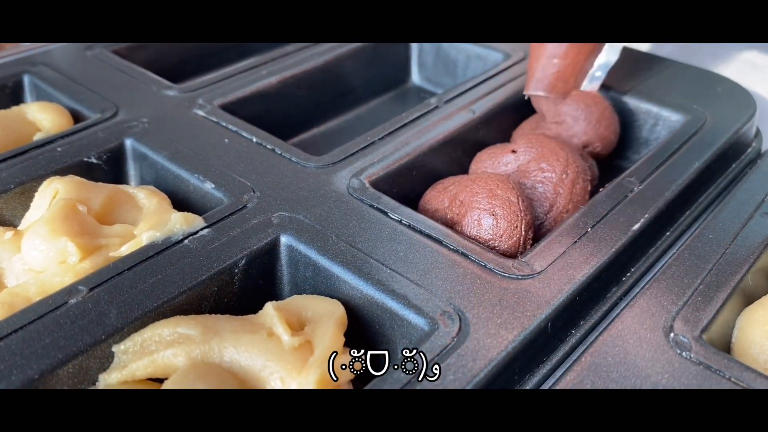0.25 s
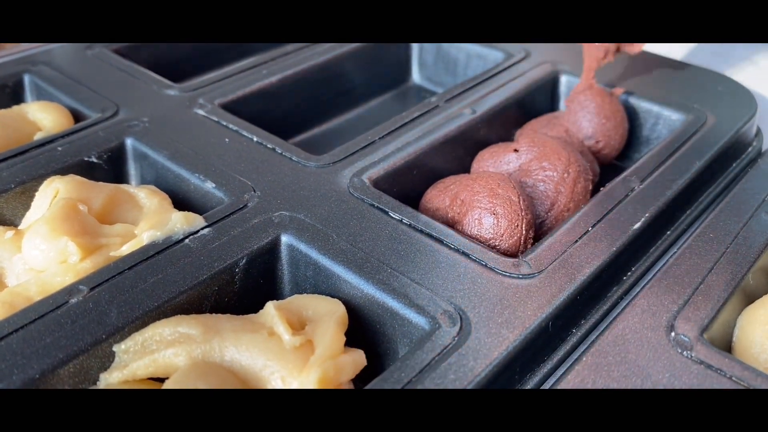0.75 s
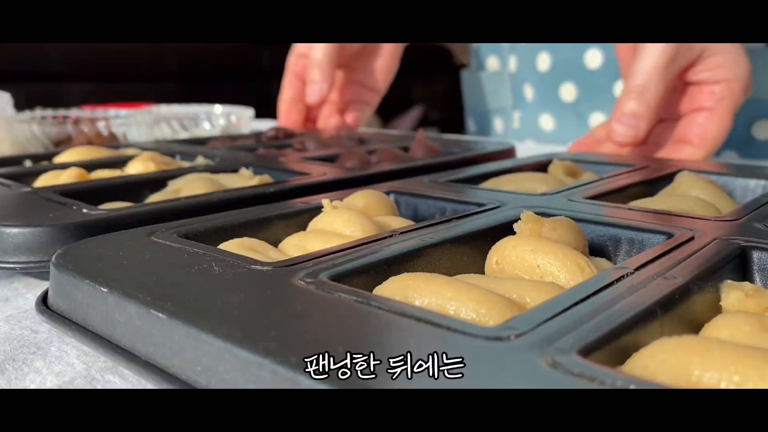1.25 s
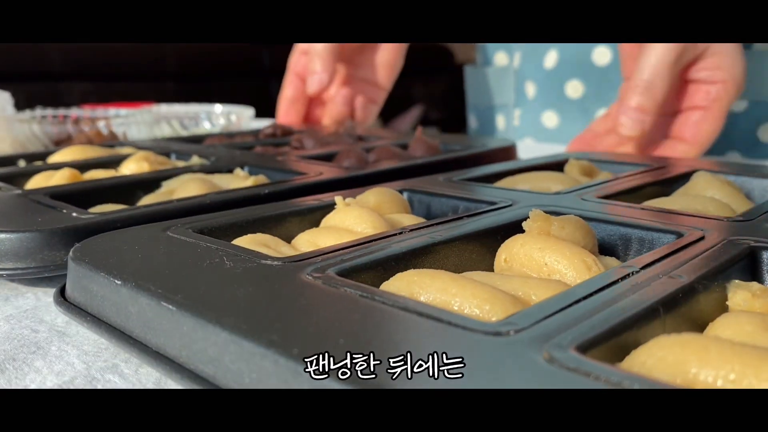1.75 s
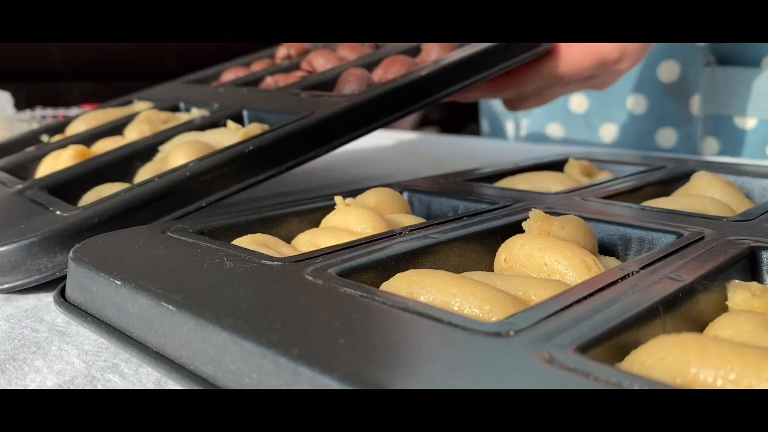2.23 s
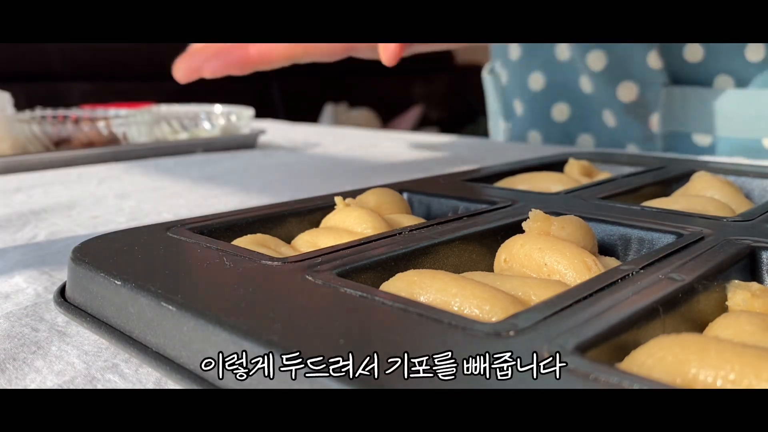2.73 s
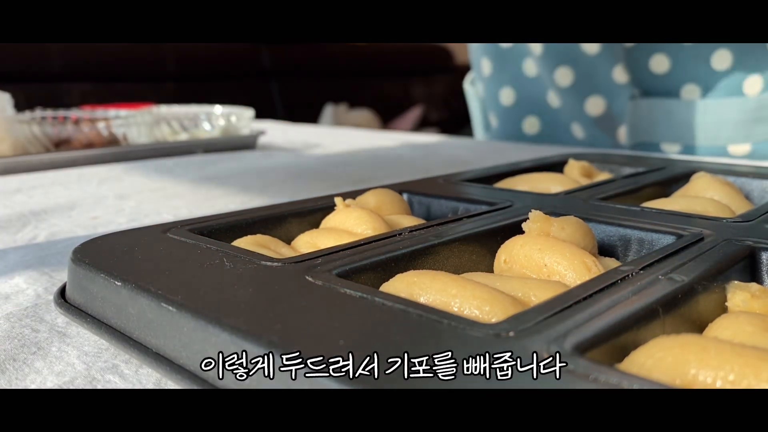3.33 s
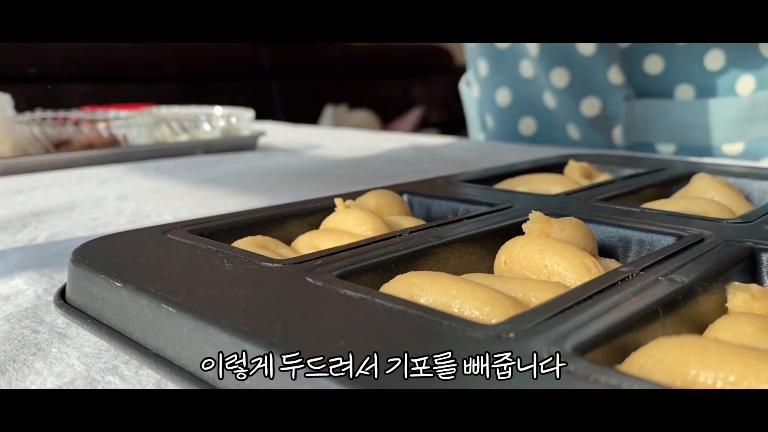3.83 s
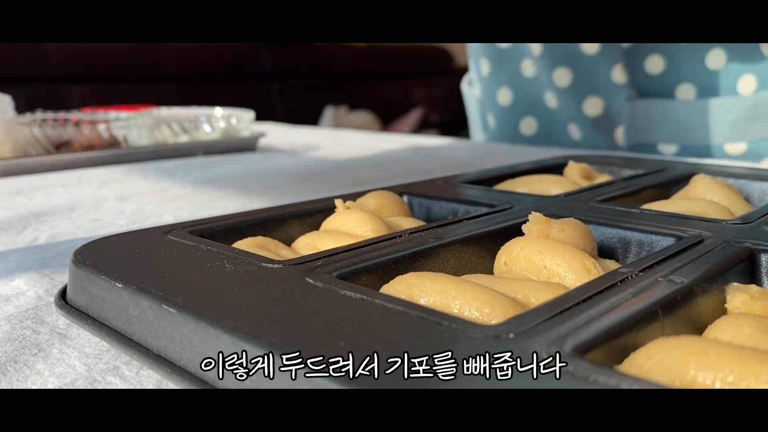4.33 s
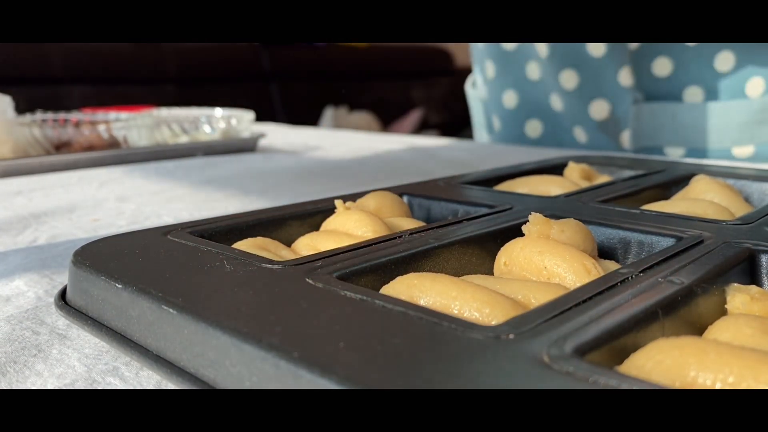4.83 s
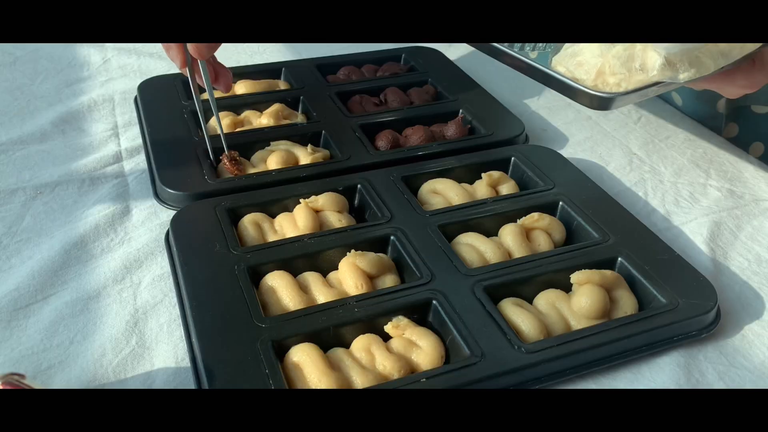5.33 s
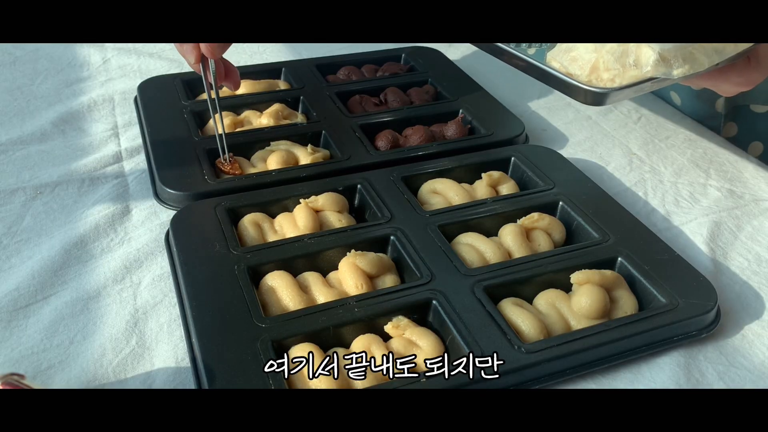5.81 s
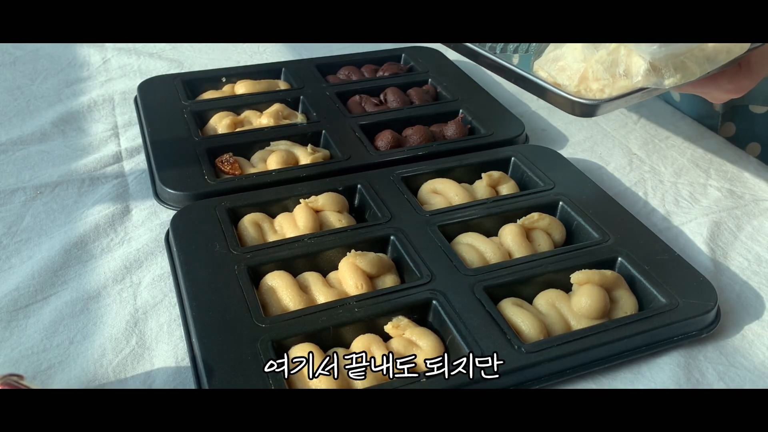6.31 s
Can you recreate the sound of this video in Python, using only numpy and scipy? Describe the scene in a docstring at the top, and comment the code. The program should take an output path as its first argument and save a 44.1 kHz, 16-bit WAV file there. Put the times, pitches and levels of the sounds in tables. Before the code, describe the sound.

A piping bag crinkles faintly, then a batter-filled steel baking pan scrapes, thumps softly and is rapped five times on a kitchen table.

```python
"""A home kitchen, pan and bag close to a two-port microphone, in three shots.
First a piping bag crinkles: clicks in noise, with air whistling and popping at the tip.
Then a steel baking pan full of batter scrapes and bumps softly as it is picked up, and is rapped five times
on a table: damped modes and noise. The batter damps it, so the room and a second pan carry the tail.
A faint appliance whine stops as the last shot begins, where tweezers tick; its hum stays, fainter."""
import sys
import numpy as np
from scipy import signal
from scipy.fft import rfft, irfft, next_fast_len
from scipy.io import wavfile

SR = 44100
rng = np.random.default_rng(int(sys.argv[2]) if len(sys.argv) > 2 else 0)


def master_out(mix):
    """Clip the mix to full scale and print it as 16-bit PCM to the path in sys.argv[1]."""
    frames = np.transpose(np.atleast_2d(mix))
    ceiling = np.clip(frames, -1, 1)
    pcm = np.round(ceiling * 32767).astype(np.int16)
    wavfile.write(sys.argv[1], SR, pcm)


N = 289645
TIME = np.arange(N) / SR
RING = TIME[:SR // 2]  # time axis of one blow

# start of each shot, and the end of the last: t/s
CUTS_S = [0, 1.078, 5.322, 7]


def undb(db):
    """Decibels to gain."""
    return 10 ** (np.asarray(db) / 20)


def at_hz(table, hz, axis=1):
    """Read a column of a table on a log-frequency axis."""
    rows = np.array(table, float)
    return np.interp(np.log(np.maximum(hz, 1)), np.log(rows[:, 0]), rows[:, axis])


def tilted(spectrum, db_per_octave):
    """Make a (f/Hz, level/dB) spectrum brighter or duller, pivoting at 1 kHz."""
    return [(hz, db + db_per_octave * np.log2(hz / 1000)) for hz, db in spectrum]


def level(x, db):
    """Set the rms level."""
    return x * undb(db) / np.sqrt(np.mean(x ** 2))


def hit_level(x, db):
    """Set the level that a blow's energy has when spread over 30 ms."""
    energy = np.mean(x ** 2) * x.shape[-1]
    return x * undb(db) / np.sqrt(energy / (.03 * SR))


def colour(x, spectrum):
    """Filter a sound by a (f/Hz, level/dB) spectrum."""
    size = next_fast_len(x.shape[-1] + SR // 10)
    gain = undb(at_hz(spectrum, np.fft.rfftfreq(size, 1 / SR)))
    return irfft(rfft(x, size) * gain, size)[..., :x.shape[-1]]


def add(out, s, x):
    """Mix a sound in at time s."""
    i = max(int(s * SR), 0)
    out[:, i:i + x.shape[-1]] += x[..., :N - i]


def fade(t60, t=RING):
    """Exponential decay that starts at t = 0."""
    return (t >= 0) * np.exp(-np.log(1000) * np.maximum(t, 0) / t60)


def wander(hz, size=N):
    """Slow complex chance of unit power, about hz wide."""
    full = next_fast_len(size)
    noise = rng.standard_normal(full) + 1j * rng.standard_normal(full)
    spectrum = noise / (1 + (2 * np.fft.fftfreq(full, 1 / SR) / hz) ** 2)
    z = np.fft.ifft(spectrum)[:size]
    return z / np.std(z)


def strokes(rows, attack_s, release_s):
    """Gain of hand movements: each swells by 60 dB, holds and fades by 60 dB."""
    gain = 0
    for s, held, db in rows:
        before = np.maximum(s - TIME, 0) / attack_s
        after = np.maximum(TIME - s - held, 0) / release_s
        gain = gain + undb(db - 60 * (before + after))
    return gain


# likeness of the left and right ports in diffuse sound: f/Hz, likeness [0-1]
LIKENESS = [(60, 1), (200, 0.95), (400, 0.7), (700, 0.6), (1300, 0), (8000, 0.4)]


def diffuse(size):
    """Stereo noise, alike in the bass and less related in the treble."""
    full = next_fast_len(size)
    like = np.clip(at_hz(LIKENESS, np.fft.rfftfreq(full, 1 / SR)), -1, 1)
    mid, side = rfft(rng.standard_normal((2, full))) * np.sqrt([1 + like, 1 - like])
    return irfft(np.array([mid + side, mid - side]), full)[:, :size] / np.sqrt(2)


def flicker(x, depth_db=3.0, rate_hz=22, count=10):
    """The midrange of a noise flickers, each narrow band on its own."""
    centres = np.geomspace(500, 3000, count + 2)
    size = next_fast_len(N)
    spectrum, hz = rfft(x, size), np.fft.rfftfreq(size, 1 / SR)
    for k in range(count):
        band = irfft(spectrum * np.interp(hz, centres[k:k + 3], [0, 1, 0]), size)[:, :N]
        gain = undb(depth_db * np.sqrt(2) * wander(rate_hz).real)
        x = x + band * (gain - 1)
    return x


def appliance(tones, speed=1):
    """Narrow wavering tones; speed raises them all alike."""
    out = 0
    for hz, db, width, waver, pan_db, lead in tones:
        share = np.clip(waver, 0, 1)
        carrier = np.exp(2j * np.pi * hz * speed * TIME)
        tone = (np.sqrt(1 - share ** 2) + share * wander(width * speed)) * carrier
        ports = np.real([tone * undb(pan_db), tone * np.exp(1j * lead * speed)])
        out = out + level(ports, db)
    return out


# room air of each shot, shape only: f/Hz, level/dB per Hz
AIR_PIPING = [(18, -85), (30, -36), (109, -4.5), (364, -9.5), (520, -3.5), (702, -11), (780, -17.5),
              (1040, -17.5), (1320, -11.5), (1670, -23.5), (4080, -34), (6550, -44.5), (12600, -50),
              (16000, -74)]
AIR_RAPPING = [(25, -16), (65, -6.5), (110, -9.5), (140, -7.5), (200, -13.5), (330, -6.5), (420, -11),
               (530, -18), (700, -9.5), (936, -23), (1370, -23.5), (2840, -41), (4400, -45.5),
               (16000, -68.5)]
AIR_LAST = [(15, -32), (25, -20), (59, -5), (97, -13.5), (285, -14), (354, -20.5), (384, -12), (476, -31),
            (575, -23.5), (734, -29.5), (1020, -29), (2200, -35.5), (3500, -42), (6380, -47), (8360, -55.5),
            (11600, -43.5), (16000, -69)]
AIR_PIPING_DB, AIR_RAPPING_DB, AIR_LAST_DB = -58.5, -57, -67
# appliance tones as heard in the rapping shot:
# f/Hz, level/dB, width/Hz, waver [share], left minus right/dB, right leads/rad
WHINE = [(673.3, -57, 9.1, 0.19, -6.5, 1.0), (1353, -77.5, 13, 0.78, -10, 0.98)]
HUM = [(385.8, -70.5, 5, .85, 0.00088, 0.092)]
PIPING_SPEED = 2  # the first shot runs at double speed, so its tones lie an octave up
PIPING_WHINE_DB, PIPING_HUM_DB, LAST_HUM_DB = -4, 1.5, -10.5  # against the rapping shot


def background(swell_db=.3):
    """Each shot has its own room air; the appliance hums throughout and whines until the last cut."""
    airs = [(AIR_PIPING, AIR_PIPING_DB), (AIR_RAPPING, AIR_RAPPING_DB), (AIR_LAST, AIR_LAST_DB)]
    piping, rapping, last = [level(colour(diffuse(N), air), db) * undb(swell_db * wander(6).real)
                             for air, db in airs]
    piping = piping + undb(PIPING_WHINE_DB) * appliance(WHINE[:1], PIPING_SPEED)
    piping = piping + undb(PIPING_HUM_DB) * appliance(HUM, PIPING_SPEED)
    rapping = rapping + appliance(WHINE + HUM)
    last = flicker(last) + undb(LAST_HUM_DB) * appliance(HUM)
    shots = zip([piping, rapping, last], CUTS_S, CUTS_S[1:])
    return sum(x * (TIME >= start) * (TIME < end) for x, start, end in shots)


# kitchen reverberation: f/Hz, level/dB, t60/s, likeness of left and right [0-1]
ROOM = [(60.47, -17, 0.99, 0.99), (137, -1.5, 0.36, 1), (228, -10.5, 0.31, 0.93), (380, -4, 0.48, 0.93),
        (730, -5.5, 0.42, 0.41), (1450, -3, 0.62, .15), (2400, -6.5, 0.48, 0.13), (5300, -9, 0.45, 0.1),
        (10400, -12, 0.28, 0.076), (16030, -11.5, 0.32, .1)]


def kitchen(x, first_s=0.00083, build_s=0.0037):
    """Reflections build up after the nearest wall answers, then die away band by band."""
    t, hz = TIME[:SR], np.fft.rfftfreq(SR, 1 / SR)
    like = np.clip(at_hz(ROOM, hz, axis=3), 0, 1)
    mid, side = rfft(rng.standard_normal((2, SR))) * np.sqrt([1 + like, 1 - like]) / np.sqrt(2)
    walls, response = np.array([mid + side, mid - side]), 0
    log_centres = np.log([row[0] for row in ROOM])
    for (_, db, t60, _), own in zip(ROOM, np.eye(len(ROOM))):
        band = np.interp(np.log(hz + 1), log_centres, own)
        envelope = np.clip((t - first_s) / build_s, 0, 1) * fade(t60, t)
        response = response + undb(db) * irfft(walls * band, SR) * envelope / np.linalg.norm(envelope)
    return signal.fftconvolve(x.mean(axis=0, keepdims=True), response, axes=1)[:, :N]


# tweezers tick as they place a topping: t/s, level/dB
TICKS = [(5.375, -88), (5.722, -90), (5.89, -80)]
# colour of the tick: f/Hz, level/dB
TICK_COLOUR = [(1500, -8), (4000, -5), (7000, -8), (11000, -1), (15500, 2)]


def tweezers(t60=.012):
    """Thin steel tips meet with a tiny bright tick."""
    out = np.zeros((2, N))
    for s, db in TICKS:
        add(out, s, hit_level(colour(diffuse(len(RING)) * fade(t60, RING - .001), TICK_COLOUR), db))
    return out


# the loudest air pockets at the bag's tip: t/s, level/dB, tilt/dB per octave, t60/s
POPS = [(.056, -71, -1, .014), (0.06, -73, 6, .008), (0.066, -71, -5, .015), (0.1075, -69, -2, .012),
        (.117, -66, 2, .017), (0.1313, -52, -1.5, 0.016), (0.139, -58.5, 5, 0.015),
        (0.1935, -71.5, 6.5, .014), (.2585, -73, -2, .017), (.287, -71, -5, .012), (.296, -72, -1, .01),
        (0.9283, -66.5, 2.5, .005), (0.9493, -76, 1, .012), (.963, -65.5, -5, .02), (.976, -67, 14, .012),
        (0.99, -67, -7, .012), (1.002, -65, 3, 0.026)]
# colour of a pop before its tilt: f/Hz, level/dB
POP_COLOUR = [(700, 0), (1600, 12), (2200, 12), (2800, 10), (3800, 2.5), (6000, -1), (10000, 3),
              (15000, -13)]


def tip_pops():
    """Air pockets burst at the piping bag's tip: short decaying noises."""
    out = np.zeros((2, N))
    for s, db, tilt, t60 in POPS:
        burst = diffuse(len(RING)) * fade(t60, RING - .001)
        add(out, s, hit_level(colour(burst, tilted(POP_COLOUR, tilt)), db))
    return out


# squeezes of the bag: t/s, held/s, level/dB, swell by 60 dB/s, tilt/dB per octave, whistle level/dB
SQUEEZES = [(.09, 0.033, -71.5, 0.3, -1.5, -6), (.135, 0.057, -68, 0.3, 1.5, -18),
            (.29, 0.011, -69.5, 0.16, 0, -18), (.88, 0.025, -75.5, 0.45, 1, -16),
            (.963, 0.012, -65.5, 0.1, 9, -10), (.99, 0.014, -67, 0.16, -1, -5)]
# colour of the plastic before its tilt: f/Hz, level/dB
BAG_COLOUR = [(700, 5.5), (1800, 10.5), (3000, -2), (3650, 2.5), (5100, 0), (5800, -5), (6800, 0),
              (8400, -3), (10000, -1.5), (15000, -7.5)]
SQUEEZE_RELEASE_S = 0.12  # to fade by 60 dB
TIP_HZ, TIP_WIDTH_HZ = 5770, 900  # resonance of air forced through the tip


def piping_bag(crinkle_db=3, grain_rate=1200, grain_db=1.3, hiss=0.44, sticky_db=2.5):
    """Plastic crinkles in uneven spurts of tiny clicks at each squeeze; air whistles and pops at the tip."""
    sizes = undb(grain_db * np.minimum(rng.exponential(size=N), 4))
    grains = (rng.random(N) < grain_rate / SR) * sizes
    clicks = signal.lfilter([1], [1, -.9], grains)
    crinkle = diffuse(N) * (clicks + hiss) * undb(sticky_db * wander(60).real)
    whistle = (wander(TIP_WIDTH_HZ) * np.exp(2j * np.pi * TIP_HZ * TIME)).real
    out = 0
    for s, held, db, attack_s, tilt, tip_db in SQUEEZES:
        plastic = level(colour(crinkle, tilted(BAG_COLOUR, tilt)), crinkle_db)
        squeeze = strokes([(s, held, db)], attack_s, SQUEEZE_RELEASE_S)
        out = out + (plastic + level(whistle, tip_db)) * squeeze
    return out * (TIME < CUTS_S[1]) + tip_pops()


def rub(speed, spectrum, uneven_db=3.5):
    """Friction: a hiss that follows the movement, catching and letting go."""
    return level(colour(diffuse(N), spectrum), 0) * speed * undb(uneven_db * wander(40).real)


# light brushing as the hands shift their grip: t/s, held/s, level/dB
BRUSHES = [(1.63, .08, -85), (2.2, 0.022, -85), (2.395, .025, -80), (2.56, .01, -85), (2.63, 0.14, -77.5)]
# colour of fingers on steel and cloth: f/Hz, level/dB
BRUSH_COLOUR = [(2000, -7), (4000, 5), (6500, 2.5), (11000, -3.5), (16000, -14)]


def grip(attack_s=0.2, release_s=.16):
    """Fingers brush over steel and cloth: a faint uneven hiss."""
    return rub(strokes(BRUSHES, attack_s, release_s), BRUSH_COLOUR)


# the pan scraping over the cloth: t/s, held/s, level/dB
SLIDES = [(1.62, .38, -74), (2.22, .08, -81), (2.67, .08, -79.5)]
# colour of the scraping hiss: f/Hz, level/dB
SLIDE_COLOUR = [(1200, -23.5), (2400, -8), (3000, -2.5), (3700, -3.5), (4500, -1.5), (5200, -12),
                (6200, -12), (8000, -31), (16000, -38.5)]
# resonances that scraping excites: f/Hz, width/Hz, level/dB, shift as the pan tips up/Hz
SLIDE_RINGS = [(2750, 110, -4.5, -400), (3100, 80, -1, -420), (3500, 150, -2.5, -350),
               (3950, 180, -1.5, -450), (4300, 180, -2, -300), (4650, 260, -4, -150),
               (5600, 600, -10.5, -600)]
SLIDE_ATTACK_S, SLIDE_RELEASE_S = 0.41, 0.44  # to swell and to fade by 60 dB
LIFT_START_S, LIFT_LENGTH_S = 1.72, .36  # the pan tips up off the cloth


def scrape(hiss_db=-3, sing_db=-2.5, drift=.012, catch_db=2.0):
    """The pan drags over the cloth: a hiss, and steel resonances that catch, let go and glide as it tips up."""
    speed = strokes(SLIDES, SLIDE_ATTACK_S, SLIDE_RELEASE_S)
    lift = np.clip((TIME - LIFT_START_S) / LIFT_LENGTH_S, 0, 1)
    drifting = 1 + drift * wander(2.2).real
    sing = 0
    for hz, width, db, shift_hz in SLIDE_RINGS:
        cycles = np.cumsum((hz + shift_hz * lift) * drifting) / SR
        port_phase = np.exp(2j * np.pi * rng.random((2, 1)))
        sing = sing + undb(db) * wander(width) * np.exp(2j * np.pi * cycles) * port_phase
    steel = level(sing.real, sing_db) * speed * undb(catch_db * wander(18).real)
    return undb(hiss_db) * rub(speed, SLIDE_COLOUR) + steel


def mode(hz, t60, swell, lag=0., t=RING):
    """A damped vibration that builds up over the swell time; it reaches the right side lag radians later."""
    rise = 1 - np.exp(-np.maximum(t, 0) / swell)
    return rise * fade(t60, t) * np.sin(2 * np.pi * hz * t - np.array([[0], [lag]]))


# modes of the table, levels against each other: f/Hz, level/dB, t60/s, swell/s
TABLE_MODES = [(57.4, -1, 0.31, 0.015), (66, 2.5, 0.2, 0.0072)]


def table_boom(db):
    """The table top swings late and low under a blow."""
    return hit_level(sum(undb(g) * mode(hz, t60, swell) for hz, g, t60, swell in TABLE_MODES), db)


MODE_DETUNE = .012  # random spread of each mode's pitch from blow to blow [share]


def pan_ring(modes, lead, touch_db, force_db, flat, cushion, opposed=False,
             scatter_db=1.4, swell=0.0027, lag_per_khz=0.825):
    """Two contacts ring a pan, each mode by how it lands; opposed gives neighbours opposite signs."""
    out = 0
    for k, (hz, db, t60, flat_db, cushion_db) in enumerate(modes):
        size, spread, detune = rng.standard_normal(3)
        hz = hz * (1 + MODE_DETUNE * detune)
        lag = lag_per_khz * hz / 1000 * (1 + .5 * spread)
        touch = undb(touch_db) * mode(hz, t60, swell, lag)
        ring = touch + mode(hz, t60, swell, lag, RING - lead)
        sign = -1 if opposed and k % 2 else 1
        mode_db = force_db + db + flat * flat_db + cushion * cushion_db + scatter_db * size
        out = out + sign * undb(mode_db) * ring
    return out


def clash(spectrum, t60, lead, touch_db, db, chatter_db=4.0, lag_s=.000028, scattered=0.94):
    """Crowded modes: a noise jumps at both contacts, chatters as it dies and partly reaches the right later."""
    contacts = undb(touch_db) * fade(t60 / 2) + fade(t60, RING - lead)
    chatter = undb(chatter_db * wander(700, len(RING)).real)
    ports = np.exp(-2j * np.pi * np.outer([0, lag_s], np.fft.rfftfreq(len(RING), 1 / SR)))
    direct_noise = irfft(rfft(rng.standard_normal(len(RING))) * ports, len(RING))
    noise = direct_noise + scattered * diffuse(len(RING))
    return hit_level(colour(noise, spectrum) * contacts * chatter, db)


# the second pan rests on the table and rings along with bumps and raps:
# f/Hz, level/dB, t60/s, more when the rap lands flat/dB, more when cushioned/dB
RESTING_PAN_MODES = [(216.7, -44.5, 0.53, 8.5, 1), (349.6, -41.5, 0.42, -4.5, 6.5),
                     (389, -43.5, 0.2, -5, 7.5), (445, -47, 0.36, -2, 10.5), (662, -43, .42, 5, 3.5),
                     (1405, -49.5, .35, -3, -9.5), (2455, -63.5, 0.4, 1, 9.5)]
# soft bumps as the pan is handled: t/s, flex pitch f/Hz, level/dB, table level/dB, t60 before its share/s
BUMPS = [(1.164, 69.7, -56.5, -56.5, 0.054), (1.7, 110.4, -18.5, -27, 0.23), (1.819, 96.7, -46, -52, 0.078),
         (1.857, 136.3, -59.5, -59, 0.044), (1.991, 106.7, -33, -52.5, 0.12),
         (2.102, 239.6, -40.5, -60.5, 0.066), (2.112, 84.8, -29, -34.5, 0.16),
         (2.292, 77.6, -49.5, -47.5, 0.134), (6.32, 70.6, -73, -62.5, .17)]
# flexing modes of the held pan: multiple of the flex pitch, level/dB, share of the t60
FLEX_MODES = [(1, 2.5, 0.43), (1.25, -16.5, 0.88), (2.45, 3.5, 0.15), (4.25, 2, 0.11)]
# a harder bump is brighter: cut-off of the softest (multiple of the flex pitch), its rise per unit of
# energy, build-up of the first flex mode (s)
BUMP_SOFT, BUMP_RISE, BUMP_SWELL_S = 1.3, 232, 0.013
# the pan settles: share by which the flex starts sharp, time to sag (s), time until the cloth chokes it (s)
BUMP_SAG, BUMP_SAG_S, BUMP_CHOKE_S = 0.18, .018, 0.028
# off the cloth the pan rings freely: from when (s), pitch (Hz), decay (s), level against the bump (dB)
FREE_FROM_S, FREE_HZ, FREE_T60_S, FREE_DB = 1.95, 141.5, 0.58, -13.5


def bumps(sympathy_db=20, tick_db=-56, tick_t60=.05):
    """Soft blows flex the pan's lowest modes, which sag and choke; each ticks, and the lifted pan rings on."""
    out = np.zeros((2, N))
    sagging = RING + BUMP_SAG * BUMP_SAG_S * (1 - np.exp(-RING / BUMP_SAG_S))
    choke = 1 / (1 + (RING / BUMP_CHOKE_S) ** 6)
    for s, hz, db, table_db, t60 in BUMPS:
        bright_hz = hz * (BUMP_SOFT + BUMP_RISE * undb(db) ** 2)
        flex = 0
        for k, g, share in FLEX_MODES:
            gain = undb(g) / (1 + (k * hz / bright_hz) ** 4)
            flex = flex + gain * mode(k * hz, t60 * share, BUMP_SWELL_S / k, t=sagging)
        sympathy = pan_ring(RESTING_PAN_MODES, 0, TOUCH_DB, db + sympathy_db, 0, 0)
        thud = hit_level(flex * choke, db) + hit_level(table_boom(0), table_db) + sympathy
        cloth = signal.butter(6, min(bright_hz + 40, 2000), fs=SR, output="sos")
        add(out, s - .002, signal.sosfilt(cloth, thud))
        add(out, s, clash(SLIDE_COLOUR, tick_t60, 0, TOUCH_DB, db + tick_db))
        if s > FREE_FROM_S:
            add(out, s, hit_level(mode(FREE_HZ, FREE_T60_S, BUMP_SWELL_S), db + FREE_DB))
    return out


# the clash sprayed into the room: f/Hz, level/dB, more when flat/dB, more when cushioned/dB
SPRAY = [(450, -1.5, -3, 6), (600, -6, 0, 0), (1050, 6, 3, 0), (1390, 13, 0, -6.5), (1670, 8.5, 1, -6),
         (1900, 7, 1.5, -3.5), (2240, 2.5, 2, 1.5), (2580, 3, 1, 5.5), (3060, -3.5, 2, -0.5),
         (5400, -1.5, -1.5, -1), (7500, -7.5, 0, 0.5), (11000, -11, -0.5, 1), (16000, -18.5, 0, 0)]
BELLY_HZ, BELLY_OCTAVES = 1520, 0.4  # centre and half-width of the belly's part in the jangle


def room_spray(flat, cushion, jangle_tilt, belly_db, t60):
    """What a rap sprays in all directions: a click and a short jangle, coloured by how it lands."""
    spectrum = []
    for hz, db, flat_db, cushion_db in SPRAY:
        belly_share = np.exp(-(np.log2(hz / BELLY_HZ) / BELLY_OCTAVES) ** 2)
        spectrum.append((hz, db + flat * flat_db + cushion * cushion_db + belly_db * belly_share))
    click = level(signal.unit_impulse(len(RING), 64), 0)
    jangle = level(rng.standard_normal(len(RING)) * fade(t60, RING - .0015), -5)
    return colour(click + jangle, tilted(spectrum, jangle_tilt))


# raps: t/s, edge touches earlier by/s, force/dB, flatness [-1 on its edge to 1 on its belly],
# cushioning by the cloth [0-1], crack tilt/dB per octave, belly pitch [ratio],
# jangle tilt/dB per octave, belly's share of the jangle/dB
RAPS = [(2.765, 0.00077, -0.5, -0.62, 0.23, -2, 0.96, -0.2, 4.5),
        (3.269, 0.0029, 0, 0.62, 0.27, 3.5, 1.017, 0.5, 0),
        (3.7789, .0032, 1.5, 0.62, 0, 1.5, 0.97, 0.2, 0.5), (4.2806, .0028, -1, .4, 1, 8.5, .99, 0, -2.5),
        (4.7717, 0.0035, -0.5, -0.86, 0.04, 3, 0.99, 0.4, -4)]
# modes of the rapped pan: f/Hz, level/dB, t60/s, more when flat/dB, more when cushioned/dB
PAN_MODES = [(136, -33.5, 0.036, -14, -9), (166.2, -28, 0.072, -2, -14), (225.6, -14, 0.041, 8, -1.16),
             (292.6, -35.5, 0.137, 12.5, 2), (327.5, -17, 0.039, 1.5, 2.5), (399.5, -19, 0.041, -6, 7.5),
             (460, -17.5, 0.049, 0, -11), (453.4, -22, 0.024, -7, 22), (589.6, -18, 0.065, 0.2, -1.5),
             (635, -24, 0.11, 1.15, 4), (695.6, -19, 0.059, 1.4, 4), (739, -25, 0.064, 0.5, 7),
             (875, -24.5, 0.056, 2.5, -1), (922, -27, 0.066, 0.3, 4.5), (1115, -20, 0.03, 7.5, -30.5)]
# close, short modes of the belly under the batter; neighbours swing against each other:
# f before the belly pitch/Hz, level/dB, t60/s, more when flat/dB, more when cushioned/dB
BELLY_MODES = [(1330, -19.5, 0.044, -3.5, -6), (1477, -10.5, 0.055, 3, -13),
               (1532, -11.5, .036, -0.5, -13.5), (1667, -24.5, .045, 1, -9.5), (1830, -26, .05, -2, -7.5),
               (2060, -18.5, 0.028, 1.5, -5)]
# the crowded high modes of the sheet: f/Hz, level/dB
SHEET = [(900, -11.5), (1800, 6.5), (2400, 4), (3200, -5.5), (4200, -3.5), (5400, -6.5), (6500, -11),
         (8000, -10.5), (11000, -24), (16000, -24)]
# the crack of steel meeting the table, before its tilt: f/Hz, level/dB
CRACK = [(800, -19), (2000, -8.5), (3300, -2.5), (4200, 0), (5300, 7), (7300, -3.5), (8500, -18.5),
         (10500, 1.5), (13000, -7.5), (15500, -9)]
# how well the clang carries into the room: f/Hz, level/dB
CARRY = [(130, 0), (250, -1.5), (480, -1.5), (590, -4), (700, 1.5), (950, -2.5), (1150, -11), (1500, -27)]
# how each part answers a rap, by name: level/dB, more when flat/dB, more when cushioned/dB
ANSWER = {"sheet": (-37, -1.3, -2.5), "crack": (-38.5, -2.2, -0.56), "spray": (-32, 0, -4)}
# the edge's first touch against the full blow, and its change when cushioned (dB)
TOUCH_DB, TOUCH_CUSHION_DB = -9, -8


def raps(sheet_t60=0.068, crack_t60=0.013, boom_db=-35, spray_t60=.035):
    """The edge lands, then the full blow: crack, clang, table boom, second pan; gives direct sound and room feed."""
    direct, sent = np.zeros((2, 2, N))
    for s, lead, force_db, flat, cushion, tilt, pitch, jangle_tilt, belly_db in RAPS:
        part_db = {part: force_db + db + flat * flat_db + cushion * cushion_db
                   for part, (db, flat_db, cushion_db) in ANSWER.items()}
        touch_db = TOUCH_DB + cushion * TOUCH_CUSHION_DB
        clang = pan_ring(PAN_MODES, lead, touch_db - 2.5, force_db, flat, cushion)
        sympathy = pan_ring(RESTING_PAN_MODES, lead, touch_db - 2.5, force_db, flat, cushion)
        belly = [(hz * pitch, *rest) for hz, *rest in BELLY_MODES]
        clang = clang + pan_ring(belly, lead, touch_db, force_db, flat, cushion, opposed=True)
        sheet = clash(SHEET, sheet_t60, lead, touch_db, part_db["sheet"])
        crack = clash(tilted(CRACK, tilt), crack_t60, lead, touch_db, part_db["crack"])
        spray = room_spray(flat, cushion, jangle_tilt, belly_db, spray_t60)
        add(direct, s - lead, clang + sympathy + sheet + crack)
        add(direct, s + .002, table_boom(boom_db))
        add(sent, s - lead, colour(clang, CARRY))
        add(sent, s - .001, hit_level(spray, part_db["spray"]))
    return direct, sent


def scene(rap_room_db=0, bump_room_db=-7):
    """Pan and bag close by, the kitchen around them."""
    blows, sent = raps()
    thuds = bumps()
    room = kitchen(undb(rap_room_db) * sent + undb(bump_room_db) * thuds)
    return background() + room + tweezers() + piping_bag() + grip() + scrape() + thuds + blows


# the two microphone ports differ: f/Hz, left leads/rad, left minus right/dB
PORTS = [(30, .22, -.6), (90, .36, -2), (200, .32, -1.8), (400, .25, .2), (800, .2, .8), (1500, 0, .3),
         (5000, 0, 1.2), (10000, 0, .3)]
TOP_HZ = 16300


def record(dry, low_hz=36):
    """The two ports differ in phase and level, most in the bass; the deepest bass and the top are cut."""
    size = next_fast_len(N)
    hz = np.fft.rfftfreq(size, 1 / SR)
    # half of the difference goes to each port
    half = np.sqrt(undb(at_hz(PORTS, hz, axis=2))) * np.exp(.5j * at_hz(PORTS, hz))
    heard = irfft(rfft(dry, size) * np.array([half, 1 / half]), size)[:, :N]
    lean = signal.sosfilt(signal.butter(4, low_hz, "high", fs=SR, output="sos"), heard)
    return signal.sosfilt(signal.ellip(8, .2, 70, TOP_HZ, fs=SR, output="sos"), lean)


dry = scene()
out = record(dry)
master_out(out)
```